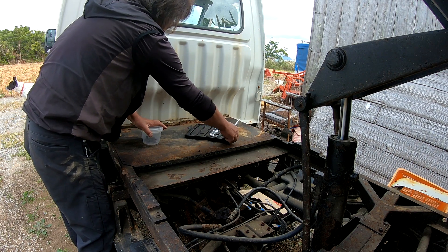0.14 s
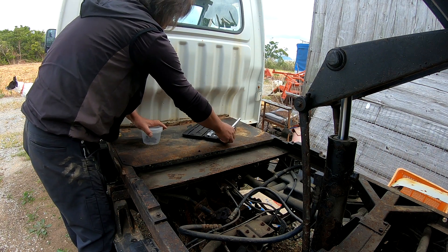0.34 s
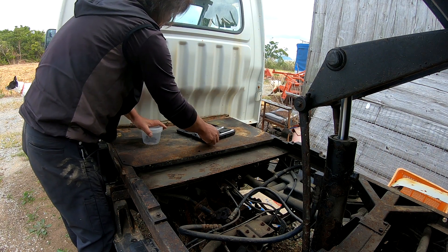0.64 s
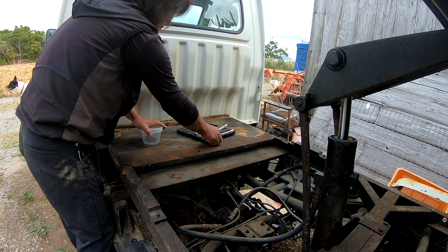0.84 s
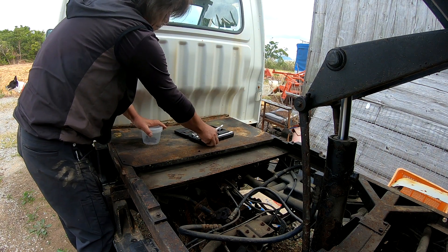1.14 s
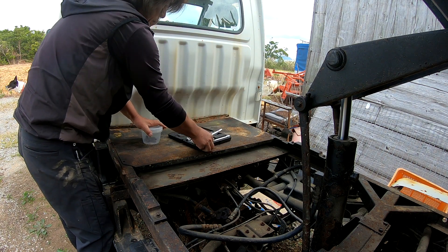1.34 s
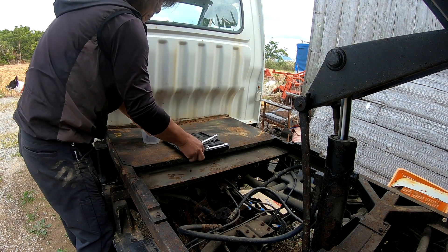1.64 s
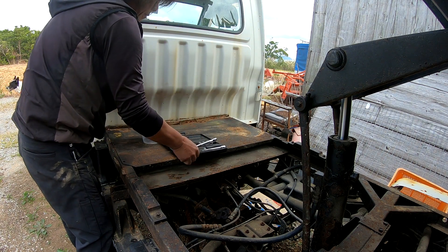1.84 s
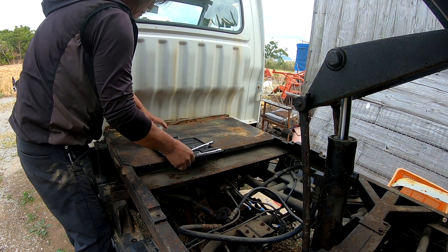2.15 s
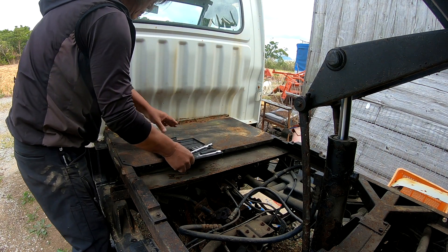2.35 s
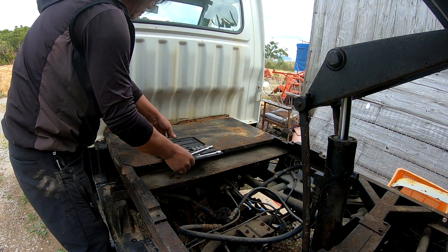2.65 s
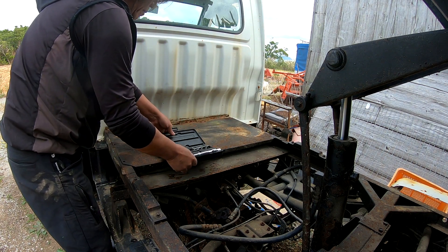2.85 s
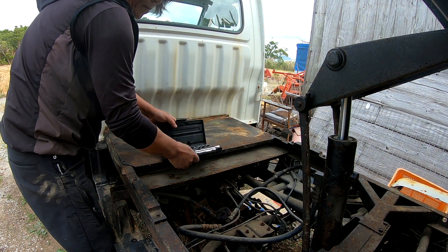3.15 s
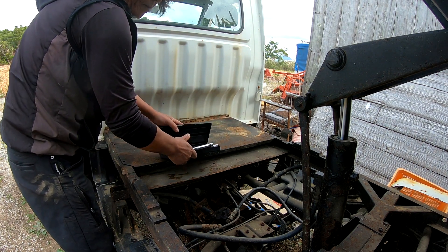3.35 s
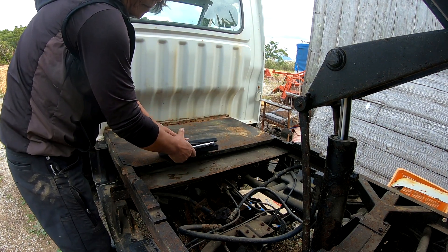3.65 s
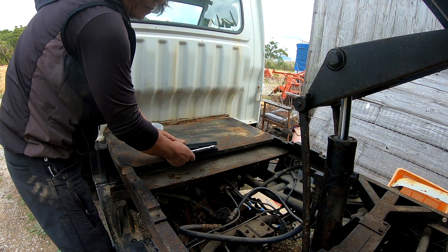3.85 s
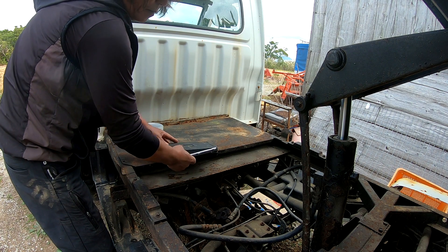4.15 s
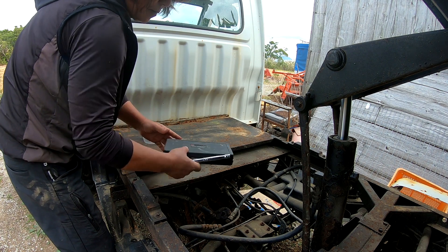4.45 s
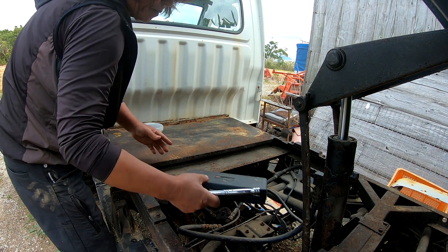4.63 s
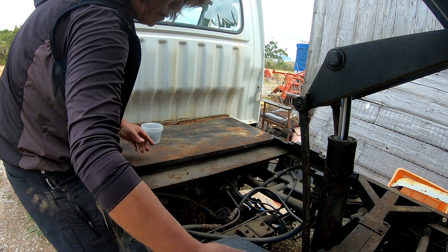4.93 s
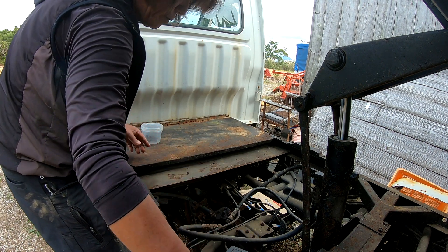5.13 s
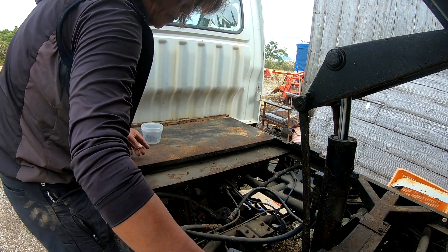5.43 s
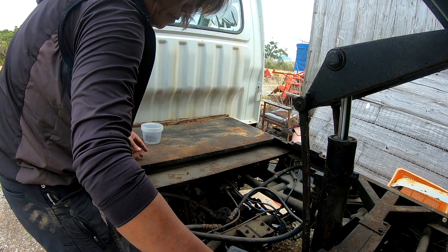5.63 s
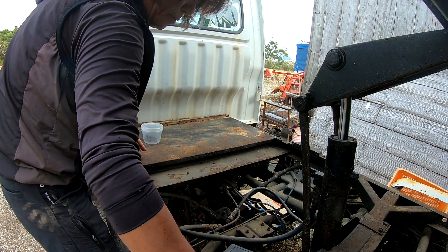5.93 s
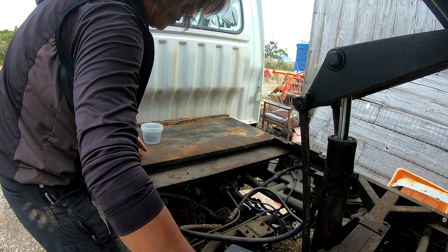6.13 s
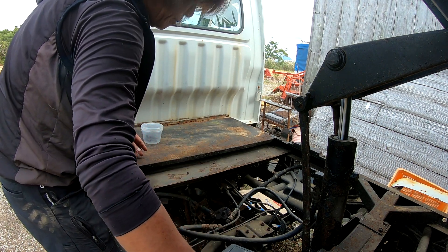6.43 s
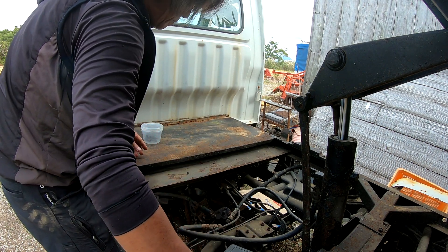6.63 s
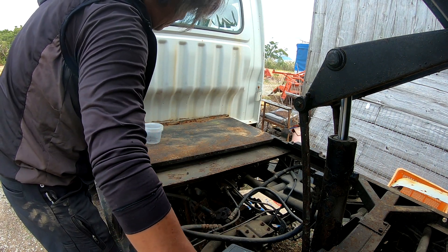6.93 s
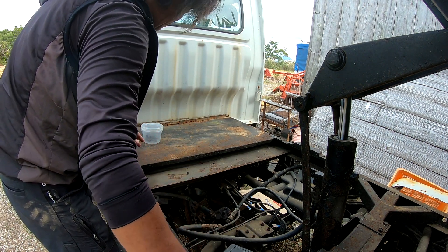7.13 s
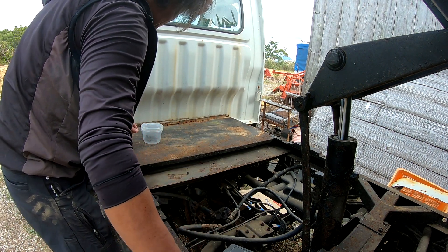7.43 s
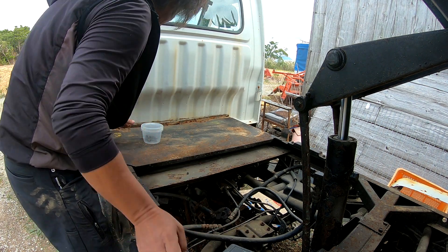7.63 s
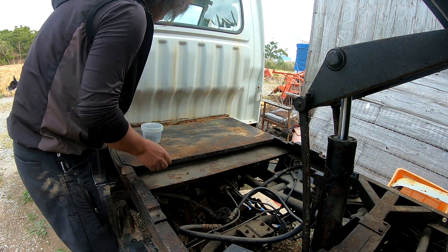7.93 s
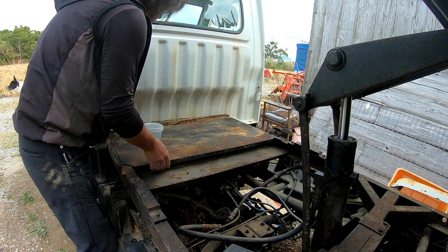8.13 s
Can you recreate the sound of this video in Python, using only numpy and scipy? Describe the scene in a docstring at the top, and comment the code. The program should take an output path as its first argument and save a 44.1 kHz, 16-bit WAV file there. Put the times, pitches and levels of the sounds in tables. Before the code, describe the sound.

Close up in a quiet, breezy yard, a plastic case of sockets is nudged and dragged twice over rusty steel with a gritty scrape and brief groan. The hinge ticks, the lid folds with hollow clacks and faint socket rattle, and a latch snaps. After a pause, the case clunks onto a steel rail, shifts with boomy knocks and clinks, and scuffs lightly. The last knock leaves a low hum. The microphone sits on the frame, so lows are heavy and wide.

```python
"""A plastic socket case is nudged and dragged twice over the rusty steel deck of a truck in a quiet, lightly windy yard.
Then its lid creaks, folds over and snaps shut; the case is set down and shifted on a chassis rail with a few knocks,
and the last one leaves a steel member humming. Blows are bursts of scattered noise, and friction is random grains;
both ring the same steel modes. Shell, rail, frame and latch add decaying sines.
The microphone rides on the frame, so most low sound comes through steel in opposite phase on the two sides."""
import sys
import numpy as np
from scipy import signal
from scipy.fft import rfft, irfft
from scipy.io import wavfile

SR = 44100
rng = np.random.default_rng(int(sys.argv[2]) if len(sys.argv) > 2 else 0)


def generate_wav(sig):
    """Save sig (samples, or channels by samples) to the path in sys.argv[1] as 16-bit PCM at SR."""
    pcm = np.round(np.clip(np.atleast_2d(sig).T, -1, 1) * 32767).astype(np.int16)
    wavfile.write(sys.argv[1], SR, pcm)


N = 365148
TIME = np.arange(N) / SR


def from_db(db):
    """Decibels to gain."""
    return 10 ** (np.asarray(db) / 20)


def rms_one(x):
    """Scale to rms 1."""
    return x / np.sqrt(np.mean(x ** 2) + 1e-20)


def in_time(rows):
    """Each column of a curve at every sample; the end values hold outside its times."""
    s, *columns = np.transpose(rows)
    return [np.interp(TIME, s, column) for column in columns]


def drift(rate):
    """Random wander through normal points of spread 1, joined by straight lines, `rate` points per second."""
    points = rng.standard_normal(20000)
    return np.interp(TIME * rate, np.arange(len(points)), points)


def band(x, low_hz, high_hz, order=2):
    """Causal band-pass."""
    edges = [low_hz, min(high_hz, 0.45 * SR)]
    return signal.sosfilt(signal.butter(order, edges, "band", fs=SR, output="sos"), x + 1e-18)


def resonate(x, hz, width_hz):
    """One resonance, gain about 1 at its top."""
    radius = np.exp(-np.pi * width_hz / SR)
    zeros = np.array([1, 0, -1]) * (1 - radius ** 2) / 2
    poles = [1, -2 * radius * np.cos(2 * np.pi * hz / SR), radius ** 2]
    return signal.lfilter(zeros, poles, x + 1e-18)


def left_right(mid, side, pan_db):
    """Mid and side to two channels; positive pan leans left."""
    return np.array([(mid + side) * from_db(pan_db / 2), (mid - side) * from_db(-pan_db / 2)])


def ping(s, hz, db, t60):
    """One mode set ringing at a given moment: a sine that decays by 60 dB in t60 seconds."""
    out, at = np.zeros(N + SR), int(s * SR)
    age = TIME[:SR]
    out[at:at + SR] = from_db(db - 60 * age / t60) * np.sin(2 * np.pi * hz * age)
    return out[:N]


def friction(grains_per_s, judder_db, judder_rate, size_spread_db=3):
    """Rust grains of uneven size catch and let go at random; judder swells and thins them. Rms 1."""
    caught = rng.random(N) < grains_per_s / SR
    size_db = size_spread_db * rng.standard_normal(N) + judder_db * drift(judder_rate)
    return rms_one(caught * rng.standard_normal((2, N)) * from_db(size_db))


def coloured_noise(colour, side_db, pan_db):
    """Stereo noise with a given spectrum, rms 1."""
    hz, db = np.transpose(colour)
    bins_hz = np.fft.rfftfreq(N, 1 / SR)
    gain = from_db(np.interp(np.log(bins_hz + 1), np.log(hz), db))
    mid, side = irfft(rfft(rng.standard_normal((2, N))) * gain, N)
    return rms_one(left_right(mid, side * from_db(side_db), pan_db))


# low rumble of wind on the microphone, before trim and buffeting: time_s, level_db
WIND_LEVEL = [(0.0, -57), (0.37, -37), (0.99, -46.5), (1.06, -30.5), (1.25, -42.5), (2.3, -41),
              (2.6, -36.5), (3.04, -42), (3.55, -27.5), (4.49, -50.5), (4.66, -37), (4.8, -55), (5.0, -34),
              (5.16, -35.5), (5.33, -32), (5.51, -43.5), (5.72, -30), (6.04, -50), (6.09, -32.5),
              (6.2, -49), (6.78, -40.5), (7.15, -31), (7.96, -57.5), (8.21, -40.5), (8.28, -31.5)]
# spectrum of the wind, relative: pitch_hz, density_db (per Hz)
WIND_SPECTRUM = [(15, -1.5), (30, -1.5), (60, 4), (100, -6), (200, -20.5), (400, -37.5), (1000, -78.5)]
# hush of the yard, before trim and wavering: time_s, level_db
YARD_LEVEL = [(0, -64.5), (2.5, -53.5), (4.7, -54), (5.5, -54), (6.2, -60.5), (7.3, -60), (8.28, -57.5)]
# spectrum of the hush, relative: pitch_hz, density_db (per Hz)
YARD_SPECTRUM = [(40, -37.5), (130, -2), (220, 9), (350, -13.5), (750, -29.5), (1400, -34.5), (3000, -41.5),
                 (7500, -41), (11000, -50.5), (15000, -63.5)]


def outdoors(wind_gain_db=-1, yard_gain_db=3, buffet_db=2, waver_db=2, changes_per_s=9):
    """Lumpy wind at the microphone over a wavering hush, each a coloured noise with a moving level."""
    wind_db = in_time(WIND_LEVEL)[0] + wind_gain_db + buffet_db * drift(changes_per_s)
    yard_db = in_time(YARD_LEVEL)[0] + yard_gain_db + waver_db * drift(changes_per_s)
    wind = from_db(wind_db) * coloured_noise(WIND_SPECTRUM, side_db=-22, pan_db=-4.5)
    yard = from_db(yard_db) * coloured_noise(YARD_SPECTRUM, side_db=0.5, pan_db=0.5)
    return wind + yard


def hum(start_s=7.074, pitch_hz=200.4, level_db=-30.5, t60_s=3, mid_share=0.2, pan_db=-1):
    """A steel member left humming by the last hard knock: one lightly damped mode, mostly side to side."""
    age = np.maximum(TIME - start_s, 0)
    envelope = np.sqrt(2) * from_db(level_db - 60 * age / t60_s)  # level is rms at the start
    tone = envelope * np.sin(2 * np.pi * pitch_hz * age)
    return left_right(mid_share * tone, tone, pan_db)


# the hardest knocks set the frame booming, at a pitch that shifts with the load:
# start_s, pitch_hz, level_db (before pan), t60_s
FRAME_BOOMS = [(4.961, 330, -19.5, 0.095), (5.629, 250, -22, 0.13), (5.867, 311.3, -21.5, 0.31),
               (6.873, 292.6, -23.5, 0.27), (7.076, 265, -27, 0.23)]


def frame_booms(mid_share=0.25, pan_db=-2):
    """A low decaying note of the frame that rocks the microphone sideways."""
    tone = sum(ping(*row) for row in FRAME_BOOMS)
    return left_right(-mid_share * tone, tone, pan_db)


# the case is set down and shifted on the rail; all but strength are relative to it:
# weight is the thud, brightness the tick, ring the tone of the struck part, twist the rocking of the frame
# start_s, strength_db, weight_db, brightness_db, ring_db, twist_db
RAIL_KNOCKS = [(4.959, -26, 9, -30, -9.5, -6), (5.017, -36, 7.5, -27, -10.5, -4),
               (5.163, -29.5, -9, -18.5, -10.5, -10), (5.198, -38.5, 16.5, -28, -5, -8),
               (5.271, -42.5, -12.5, -26, 4, -5.5), (5.311, -46.5, 8.5, -20, -17, -3),
               (5.366, -43.5, -6, -38, -10, -5.5), (5.459, -45, 1, -43.5, -6.5, -8.5),
               (5.593, -31, 10, -28.5, -17, -18), (5.629, -17.5, -2, -35.5, -9, -10),
               (5.638, -27, -3, -27.5, -11, -6), (5.667, -23.5, 3.5, -33.5, 3, -8),
               (5.678, -29.5, -10, -35, 6, -11), (5.688, -32, -3.5, -30, -0.5, -4.5),
               (5.737, -32, -13.5, -31.5, -8, -11), (5.868, -25.5, 0.5, -46, 1, 3),
               (5.917, -28.5, -2, -43, 1.5, 2), (6.041, -28.5, 3.5, -38.5, -12, 7),
               (6.47, -50.5, 11, -65, -20, 11.5), (6.871, -26, 6, -44.5, -3, 5.5),
               (7.074, -27, -6.5, -27.5, -9, 4.5), (7.112, -32.5, -2.5, -43, -4, 2.5)]


def boom(pitch_hz=465, t60_s=0.4, mid_share=0.071, detune=0.0074):
    """Blows that twist the rail leave its main bending mode ringing, detuned a little each time."""
    relative_db, db_per_twist_db = -12.5, 2.6
    out, age = np.zeros(N + SR), np.arange(SR) / SR
    for s, strength_db, *_, twist_db in RAIL_KNOCKS:
        level_db = strength_db + relative_db + db_per_twist_db * twist_db - 60 * age / t60_s
        hz = pitch_hz * (1 + detune * rng.standard_normal())
        out[int(s * SR):][:SR] += from_db(level_db) * np.sin(2 * np.pi * hz * age)
    return left_right(mid_share * out[:N], out[:N], 0)


# the case creeps along the rail and scuffs as it is seated; its first level also holds, faintly, before it:
# time_s, level_db (relative), brightness_db_per_octave
CREEP = [(6.1, -59, -5), (6.31, -58, -10), (6.42, -65, 1), (6.47, -42.5, -10.5), (6.54, -49, -6),
         (6.58, -54, -2), (6.65, -42, -14), (6.685, -54, -9), (6.73, -39, -11), (6.77, -40, -1),
         (6.81, -42.5, -3), (6.86, -51, -2), (6.88, -26, -4.5), (6.94, -49, -2), (7.06, -57, -7.5),
         (7.08, -28.5, -5.5), (7.12, -33, -1), (7.18, -63, 4), (7.3, -100, 0)]
# resonances of that scrape: pitch_hz, width_hz, level_db (relative)
CREEP_MODES = [(455, 35.7, -12.5), (540, 25, -21.5), (621, 28, -10), (715, 18, -12), (928, 29, -15.5),
               (1127, 34, -22), (1312, 70, -13), (1435, 17, -19), (1590, 85, -17.5)]


def creep(wander_db=2.5, wanders_per_s=14, mid_cut_db=4, pan_db=-1.5):
    """A light scrape of grains sings in a few resonances, each swelling and fading as the contact moves."""
    level_db, brightness = in_time(CREEP)
    pivot_hz = CREEP_MODES[2][0]
    out = np.zeros((2, N))
    for hz, width_hz, db in CREEP_MODES:
        grains = friction(grains_per_s=900, judder_db=2, judder_rate=45)
        once = resonate(grains, hz, 2 * width_hz)
        ring = rms_one(resonate(once, hz, 2 * width_hz))
        swelling_db = wander_db * (drift(wanders_per_s) - 0.5)
        tilt_db = brightness * np.log2(hz / pivot_hz)
        out += from_db(level_db + swelling_db + db + tilt_db) * ring
    return left_right(out[0] * from_db(-mid_cut_db), out[1], pan_db) / 2


# the lid hinge slips in single soft ticks: start_s, level_db (before trim and filter)
CREAKS = [(2.371, -61), (2.445, -62), (2.454, -63), (2.47, -66), (2.486, -58), (2.593, -66), (2.641, -64),
          (2.665, -61), (2.674, -61.5), (2.722, -61), (2.742, -58.5), (2.776, -51), (2.787, -59)]


def hinge(gain_db=-2, t60_s=0.012, low_hz=1750, high_hz=2750, pan_db=3):
    """The plastic hinge slips in soft, uneven ticks: short decaying bursts of band-passed noise."""
    slips = np.zeros(N)
    for s, db in CREAKS:
        slips[int(s * SR)] = from_db(db)
    envelope = signal.lfilter([1], [1, -from_db(-60 / (t60_s * SR))], slips + 1e-18)
    creak = band(envelope * rng.standard_normal((2, N)), low_hz, high_hz, order=3)
    creak *= np.sqrt(SR / 2 / (high_hz - low_hz))  # make up for the power lost to the band
    return from_db(gain_db) * left_right(*creak, pan_db)


# the sockets rattle in their tray: start_s, length_s, level_db
RATTLES = [(2.836, 0.062, -61.5), (3.236, 0.0093, -53.5), (3.324, 0.0089, -56), (3.654, 0.026, -50.5),
           (5.153, 0.0066, -60), (5.218, 0.04, -63), (5.262, 0.012, -54.5), (5.621, 0.023, -44.5),
           (5.662, 0.03, -46.5), (5.736, 0.017, -67), (5.861, 0.014, -52), (7.056, 0.038, -69)]
# their short, damped clinks: pitch_hz, width_hz, level_db (relative)
SOCKET_MODES = [(1100, 150, -4), (1430, 190, 5.5), (1920, 165, 2.5), (2290, 300, -1), (2920, 80, -2),
                (3460, 910, -16)]


def sockets(side_db=-3, settle_s=0.019):
    """Loose steel sockets chatter and settle quickly: random clicks ring damped resonances."""
    level = 0
    for s, length_s, db in RATTLES:
        settling = np.exp(-np.clip((TIME - s - length_s) / settle_s, 0, 20))
        level = level + from_db(db) * (TIME > s) * settling
    clicks = friction(grains_per_s=1800, judder_db=1, judder_rate=80)
    rings = sum((-1) ** k * from_db(db) * resonate(clicks, hz, width_hz)
                for k, (hz, width_hz, db) in enumerate(SOCKET_MODES))
    mid, side = band(rings, 1000, 4900)
    return level * rms_one(left_right(mid, side * from_db(side_db), 0))


# a single socket tips against its neighbour: start_s, pitch_hz, level_db (before pan)
CLINKS = [(3.602, 2940, -58), (3.604, 6260, -60), (4.183, 1920, -70), (5.195, 2920, -58), (5.27, 1344, -46),
          (5.272, 2120, -59), (5.629, 1930, -47), (5.669, 1510, -49.5), (5.676, 2030, -42),
          (5.684, 2380, -47), (5.737, 1480, -56)]


def clinks(t60_s=0.059, split=0.044, twin_db=-4, pan_db=-0.5):
    """A socket rings briefly with a close pair of modes."""
    tone = sum(ping(s, hz, db, t60_s) + ping(s, hz * (1 + split), db + twin_db, t60_s) for s, hz, db in CLINKS)
    return left_right(tone, 0, pan_db)


# the latch rings brightly, and the closed case sounds its hollow note: pitch_hz, level_db, t60_s
LATCH_MODES = [(440, -23.5, 0.12), (2050, -42, 0.059), (2290, -33.5, 0.039), (3680, -38, 0.023),
               (4860, -36, 0.032), (5500, -44, .025), (6340, -39.5, 0.032), (7500, -47.5, 0.039)]


def latch(start_s=3.9725):
    """The snap that locks the lid: all its modes set off together."""
    return left_right(sum((-1) ** k * ping(start_s, *mode) for k, mode in enumerate(LATCH_MODES)), 0, 0)


# the closed case sounds a hollow note as it meets the rail: start_s, pitch_hz, level_db, t60_s
HOLLOW_NOTES = [(5.163, 444, -31, 0.067), (5.63, 475, -21, 0.15), (5.748, 812, -44, 0.073),
                (6.043, 489, -33, .12)]


def hollow_notes():
    """The walls of the closed case ring briefly, one decaying sine each time."""
    return left_right(sum(ping(*row) for row in HOLLOW_NOTES), 0, 0)


# the case damps the rail while pressed on and lets it ring when tipped; the first value also serves
# all earlier blows, on the shell too: time_s, ring_time_factor
DAMPING = [(5.75, 0.66), (5.85, 1.5), (6.1, 1.14), (6.8, 0.68)]


def struck_part(modes, knocks, side_db, spread_db, detune):
    """Every blow rings each mode as a beating pair of uneven strength; grip and load detune them a little."""
    out, age = np.zeros((2, N)), np.arange(SR // 3) / SR
    hz, db, t60 = np.transpose(modes + modes)[:, :, None]
    for s, strength_db, _, _, ring_db, twist_db in knocks:
        pitch = hz * (1 + detune * rng.standard_normal(hz.shape))
        uneven_db = spread_db * rng.standard_normal((2, *hz.shape))
        sign = rng.choice([-1, 1], (2, *hz.shape))
        strength = sign * from_db(strength_db + ring_db + db + uneven_db)
        damped_t60 = t60 * np.interp(s, *np.transpose(DAMPING))
        tones = from_db(-60 * age / damped_t60) * np.sin(2 * np.pi * pitch * age)
        rings = np.sum(strength * tones, axis=1)
        out[:, int(s * SR):][:, :len(age)] += rings * from_db([[0], [twist_db]])  # twist lifts the side
    mid, side = band(out, hz.min() / 2, hz.max() * 1.2, order=3) / np.linalg.norm(from_db(db))
    return left_right(mid, side * from_db(side_db), 0)


# modes of the plastic shell: pitch_hz, level_db (relative), t60_s (before damping)
SHELL_MODES = [(392, 17, 0.12), (465, 0.5, 0.036), (658, 3.5, 0.09), (752, 3, 0.15), (862, -6, 0.21),
               (1188, -4, 0.072), (1323, 2, 0.14), (1660, -3.5, 0.13), (1980, -4, 0.06), (2320, 0.5, 0.045)]
# modes of the chassis rail, the short ones being the dull clunk of contact:
# pitch_hz, level_db (relative), t60_s (before damping)
RAIL_MODES = [(325.5, 9.5, 0.31), (491, 16, 0.12), (575, 3.5, 0.069), (730, 8, 0.1), (840, 10.5, 0.026),
              (956, -1, 0.17), (1024, -5, 0.12), (1160, 4.5, 0.1), (1260, 12, 0.012), (1310, 7, 0.044),
              (1380, -6.5, 0.19), (1590, -2.5, 0.052), (2078, -12.5, 0.1), (2350, -7, 0.064)]
# the case bumps on the deck, its lid folds over and snaps shut; all but strength are relative to it:
# start_s, strength_db, weight_db, brightness_db, ring_db, twist_db
CASE_KNOCKS = [(0.029, -41, 20.5, -48, -24, 8), (0.855, -36.5, -2.5, -22, -15.5, 0),
               (1.048, -34, 18.5, -20, -5, 5), (1.62, -33, 6, -19, -7, 4), (2.146, -22.5, 1, -49, -32, -5),
               (2.839, -45.5, -4, -14, -15, -2), (2.847, -30.5, 8, -29.5, -16, 3.5),
               (3.241, -37.5, 15.5, -26, -5.5, 5), (3.283, -43.5, 2.5, -17, -21, -1),
               (3.332, -27.5, -22, -32, -9, -14), (3.372, -34.5, -8.5, -18.5, -2, -2),
               (3.501, -35, 9, -41, -11, -1), (3.656, -24, 7, -16, -7, -20),
               (3.662, -21.5, -13, -21, -3, 2), (3.741, -46, 10.5, -29, 8.5, -0.5),
               (3.855, -60, 29.5, -6.5, -11, 3), (3.94, -38.5, 0, -18, 0, -2), (3.973, -31, 5, -12, -2, -2)]


def shell_and_rail(shell_db=2, rail_db=-0.5):
    """The hollow snap of the plastic case and the clank of the rail, each ringing its own modes."""
    shell = struck_part(SHELL_MODES, CASE_KNOCKS, side_db=-6.5, spread_db=3.5, detune=0.0057)
    rail = struck_part(RAIL_MODES, RAIL_KNOCKS, side_db=5, spread_db=2, detune=0.016)
    return from_db(shell_db) * shell + from_db(rail_db) * rail


# the dragged case groans as it sticks and slips; the first level also holds, faintly, before it:
# time_s, pitch_hz (before waver), level_db
GROAN = [(.46, 268, -56.5), (.495, 280, -24.5), (.53, 289.7, -22.5), (.55, 280, -28), (.58, 287, -46),
         (.65, 278, -110)]


def groan(waver=0.012, wavers_per_s=60, side_share=0.49):
    """For a moment the slips lock to a mode of the deck: one wavering sine."""
    hz, db = in_time(GROAN)
    phase = 2 * np.pi * np.cumsum(hz * (1 + waver * drift(wavers_per_s))) / SR
    return from_db(db) * left_right(np.sin(phase), side_share * np.cos(phase), 0)


# a hard grain screeches briefly under the case: start_s, length_s, level_db
SCREECHES = [(0.29, 0.01, -47), (1.827, 0.01, -49), (1.868, 0.0098, -48.5), (1.912, 0.0026, -42),
             (1.93, 0.0031, -36.5), (2.049, 0.0068, -46)]


def screech(hz=7600, width_hz=1300, rise_s=0.0032, fall_s=0.0068, pan_db=2):
    """Very fast slips, over almost at once: noise through a narrow treble resonance."""
    level = 0
    for s, length_s, db in SCREECHES:
        rise = np.clip((TIME - s) / rise_s, 0, 1)
        fall = np.exp(-np.clip((TIME - s - length_s) / fall_s, 0, 20))
        level = level + from_db(db) * rise * fall
    once = resonate(rng.standard_normal((2, N)), hz, 2 * width_hz)
    mid, side = resonate(once, hz, 2 * width_hz)
    return level * rms_one(left_right(mid, side, pan_db))


def swell(start_s, length_s, attack_s=0.016, release_s=0.036):
    """Attack, hold and release of one movement of the hand."""
    out, at = np.zeros(N), int(max(start_s, 0) * SR)
    age = TIME[:min(int((length_s + 0.5) * SR), N - at)]
    release = np.exp(-np.maximum(age - length_s, 0) / release_s)
    out[at:at + len(age)] = np.minimum(age / attack_s, 1) * release
    return out


# early in a drag fresh rust sizzles under the case: start_s, length_s, level_db
SIZZLES = [(0.012, 0.078, -67.5), (0.254, 0.3, -61), (1.136, 0.13, -57.5)]


def sizzle(low_hz=10000, high_hz=13500, pan_db=2):
    """The finest grains hiss in the high treble, passed straight through a band instead of the deck modes."""
    level = sum(from_db(db) * swell(s, length_s) for s, length_s, db in SIZZLES)
    grains = friction(grains_per_s=3400, judder_db=7.5, judder_rate=110)
    return level * rms_one(left_right(*band(grains, low_hz, high_hz), pan_db))


def register_levels(strength_db, weight_db, brightness_db, clack_share=0.75):
    """Thud, body, clack and tick of one contact: weight feeds the lows, a hard contact the highs."""
    return strength_db + np.array([weight_db, 0, clack_share * brightness_db, brightness_db])


# the case catches on a grain of rust: start_s, strength_db (relative)
CATCHES = [(0.278, -55.5), (0.397, -52), (1.158, -52.5), (1.214, -50.5), (1.261, -51), (1.408, -50.5),
           (1.62, -53.5), (1.838, -52), (1.93, -52.5), (1.986, -58.5), (2.057, -66), (2.335, -77.5),
           (6.552, -80.5), (6.817, -74)]
# how a blow feeds the steel: sway relative to thud in dB, ring time factor
ON_DECK, ON_RAIL, ON_GRIT = (-20.5, 0.57), (-11, 0.9), (-10, 0.64)


def all_blows(catch_weight_db=19, catch_brightness_db=7.5, weight_doubles_ring_db=20):
    """Every knock and catch as start_s, register levels_db, ring time factor, twist_db; heavy ones ring longer."""
    catches = [(s, db, catch_weight_db, catch_brightness_db, 0, 0) for s, db in CATCHES]
    for rows, (sway_db, ring) in ((CASE_KNOCKS, ON_DECK), (RAIL_KNOCKS, ON_RAIL), (catches, ON_GRIT)):
        for s, strength_db, weight_db, brightness_db, _, twist_db in rows:
            levels_db = register_levels(strength_db, weight_db, brightness_db)
            ring_factor = np.clip(ring * 2 ** (weight_db / weight_doubles_ring_db), 0.1, 1)
            yield s, [levels_db[0] + sway_db, *levels_db], ring_factor, twist_db


def blows(index, t60_s, air, crack=0.49, scatter=0.81, crack_follows_brightness=0.11):
    """Each blow is one push, sharper if the contact is hard, then waves that scatter in the steel and die away."""
    force = np.zeros((2, N))
    push = np.array([air, -np.sqrt(1 - air ** 2)])  # mid by air, side through the steel
    for s, levels_db, ring_factor, twist_db in all_blows():
        at, decay = int(s * SR), t60_s * ring_factor * SR / np.log(1000)
        age = np.arange(min(N - at, SR))
        blow = scatter * np.exp(-age / decay) * rng.standard_normal((2, len(age)))
        brightness_db = levels_db[4] - levels_db[2]
        blow[:, 0] += crack * from_db(crack_follows_brightness * brightness_db) * np.sqrt(decay / 2) * push
        if index == 2:  # twist rocks the body register sideways
            blow[1] *= from_db(twist_db)
        force[:, at:at + len(age)] += from_db(levels_db[index]) * blow
    return force


# drone, grind, rasp, hiss: full_vigour_level_db (before the deck), db_per_db_of_vigour, lag_s,
# grains_per_s, judder_db, judders_per_s
FRICTION = [(-17.5, 0.43, 0.029, 3600, 0.5, 40), (-25, 0.73, 0.015, 2000, 1, 70),
            (-40, 0.71, 0, 3000, 0.9, 130), (-45, 0.69, 0.001, 8300, 0.5, 260)]
# vigour of the nudge and of the two drags across the deck: time_s, vigour_db
NUDGE = [(0.01, -70), (0.028, -66.5), (0.07, -71), (0.084, -60.5), (0.122, -78), (0.146, -66), (0.21, -101)]
SHORT_DRAG = [(0.211, -77.5), (0.284, -69), (0.33, -60), (0.355, -53.5), (0.382, -60), (0.406, -56),
              (0.434, -61), (0.53, -46), (0.565, -55), (0.622, -63.5), (0.645, -73.5), (0.719, -100)]
LONG_DRAG = [(1.015, -81), (1.054, -59), (1.076, -58), (1.42, -43.5), (1.53, -47.5), (1.68, -57.5),
             (1.79, -58.5), (1.832, -61.5), (1.912, -58), (1.93, -55.5), (1.97, -59.5), (2.016, -52.5),
             (2.128, -65.5), (2.163, -55.5), (2.3, -89)]
# the case shifts under the hands; weight and brightness are relative to strength:
# start_s, length_s, strength_db, weight_db, brightness_db
RUBS = [(0.692, 0.59, -61, 20, -14.5), (1.028, 0.076, -41, 18.5, -17), (2.2, 0.21, -59.5, 22.5, -45),
        (2.714, 0.3, -61.5, 20.5, -16.5), (2.856, 0.15, -45.5, 14.5, -27.5), (3.015, 0.18, -63, 23, -13.5),
        (3.154, 0.32, -49, 16, -19), (3.455, 0.091, -58.5, 21, -20.5), (3.576, 0.061, -42, 3, -23.5),
        (3.639, 0.13, -44.5, 17, -33), (3.75, 0.44, -59.5, 24, -22.5), (4.137, 0.019, -58, 10, -11),
        (4.933, 0.019, -46, 20, -30.5), (5.205, 0.047, -40, 0.5, -33), (5.272, 0.023, -47.5, 5, -30),
        (5.312, 0.88, -59.5, 19.5, -28.5), (5.622, 0.046, -41.5, 4.5, -29.5), (6.062, 0.14, -67.5, 27, -55),
        (6.168, 0.64, -71, 25.5, -52.5), (6.441, 0.094, -54.5, 17.5, -51), (6.62, 0.025, -61, 24, -56.5),
        (6.733, 0.08, -53, 19.5, -33), (6.904, 0.13, -61.5, 8, -40), (7.058, 0.12, -52.5, -7, -32),
        (8.142, 0.17, -60.5, 0, -18.5)]


def sliding_levels(index, full_vigour_db=-43):
    """Dragging and rubbing gain in one register: a drag brightens with its vigour and its lows follow late."""
    full_db, follows, lag_s = FRICTION[index][:3]
    rub_power = sum((from_db(register_levels(*contact)[index]) * swell(s, length_s)) ** 2
                    for s, length_s, *contact in RUBS)
    dragged = 0
    for drag in (NUDGE, SHORT_DRAG, LONG_DRAG):
        s, vigour_db = np.transpose(drag)
        level_db = full_db + follows * (np.interp(TIME - lag_s, s, vigour_db) - full_vigour_db)
        dragged = dragged + from_db(level_db) * swell(s[0], s[-1] - s[0])
    return dragged, np.sqrt(rub_power)


def sliding(index):
    """Friction in one register: random grains for the drags, and jerkier ones for the rubs."""
    dragged, rubbed = sliding_levels(index)
    rub_grains = friction(grains_per_s=7000, judder_db=2, judder_rate=60)
    return dragged * friction(*FRICTION[index][3:]) + rubbed * rub_grains


# the plate's edges send the scraping back: delay_s (middle of its wander), share
EDGE_ECHOES = [(.0013, .45), (.0031, .45), (.0057, .35)]


def edge_echoes(force, shift=0.22, shifts_per_s=7):
    """Short reflections, their delays wandering as the case moves, give a shifting metallic colour."""
    out = force.copy()
    for delay_s, share in EDGE_ECHOES:
        delay = np.round(delay_s * SR * np.exp(shift * drift(shifts_per_s))).astype(int)
        sent = np.arange(N) - delay
        out += share * force[:, np.maximum(sent, 0)]
    return out / np.sqrt(1 + sum(share ** 2 for _, share in EDGE_ECHOES))


# modes of deck, frame and case: pitch_hz, width_hz, level_db (relative within the register), side_over_mid_db
DECK_MODES = [(49.7, 4.1, 1.5, 25.5), (64.8, 57, 4.5, 7), (122.5, 9.7, 3, 6), (175.6, 17.2, 3, 13.5),
              (178.4, 12, -2.5, 7), (212.5, 70, -18, 7.5), (243, 11, -8.5, 15.5), (280, 28.7, -7, 4.5),
              (330, 60, -8, 1.5), (436, 7.2, 5, 13), (480, 12, 4, 15), (541, 10, 0.5, 12.5),
              (618, 32.4, -2, 9), (719, 14, -7, 7.5), (790, 130, -12.5, 10.5), (932, 43.5, -8, 12),
              (958, 86, -14, 6), (1144, 41, 4.5, -2.5), (1268, 53, 2, -3), (1490, 82, 2, -1.5),
              (1646, 460, -3, 0.5), (2163, 187, 0.5, 0), (2368, 230, -4, -3), (3020, 380, -6.5, -6.5),
              (3295, 72, 0.5, -1), (3730, 380, 1.5, -9.5), (5110, 830, -2.5, -6.5), (6110, 1010, -2, -5),
              (7660, 830, 1.5, -0.5), (9930, 1400, -7.5, 0.5), (12400, 1800, -18.5, -1.5)]


def deck(force, low_hz, high_hz, pan_db, shared=0.48, airborne_hz=900):
    """A mid and side force rings the modes of one register; white force keeps about its level."""
    out, power = np.zeros((2, N)), 1e-12
    for k, (hz, width_hz, db, side_db) in enumerate(DECK_MODES):
        if low_hz < hz < high_hz:
            mid, side = resonate(force, hz, width_hz)
            if hz > airborne_hz:  # the slope of the mid, as side, makes high modes reach the left first
                slope = np.gradient(mid) / np.sin(2 * np.pi * hz / SR)
                side = shared * slope + np.sqrt(1 - shared ** 2) * side
            mode = np.array([mid, side * from_db(side_db)]) / np.hypot(1, from_db(side_db))
            out += (-1) ** k * from_db(db) * mode
            power += from_db(db) ** 2 * np.pi * width_hz / SR
    return left_right(*band(out, low_hz, high_hz, order=3), pan_db) / np.sqrt(power)


# sway, thud, body, clack, tick: low_hz, high_hz, t60_s (before ring factor), air_share of a blow,
# left_over_right_db, blow_gain_db
REGISTERS = [(31.4, 83, 1, 0.84, -6, 7.5), (91, 306, 0.43, 1, -4, 0.5), (307, 1028, 0.16, 0.39, -2.5, 1),
             (1140, 3240, 0.16, 0.25, -0.5, 2), (3130, 13000, 0.14, 0.88, 2, 2)]


def case_on_steel(drone_sway_db=-7):
    """Blows and friction of the case drive the same steel modes, register by register."""
    drone, grind, rasp, hiss = (sliding(k) for k in range(len(FRICTION)))
    sway = from_db(drone_sway_db) * drone
    rubbing = [sway, drone, grind, edge_echoes(rasp), edge_echoes(hiss)]
    out = np.zeros((2, N))
    for k, (low_hz, high_hz, t60_s, air, pan_db, blow_db) in enumerate(REGISTERS):
        force = rubbing[k] + from_db(blow_db) * blows(k, t60_s, air)
        out += deck(force, low_hz, high_hz, pan_db)
    return out


def scene():
    """Everything at the microphone, from the background to the case on the steel."""
    background = outdoors() + hum()
    frame_and_rail = frame_booms() + boom() + creep()
    case_parts = hinge() + sockets() + clinks() + latch() + hollow_notes() + shell_and_rail()
    dragging = groan() + screech() + sizzle()
    return background + frame_and_rail + case_parts + dragging + case_on_steel()


def record(dry, cutoff_hz=15700):
    """The top is cut steeply, down 70 dB from the cutoff on."""
    return signal.sosfilt(signal.cheby2(16, 70, cutoff_hz, fs=SR, output="sos"), dry)


dry = scene()
out = record(dry)
generate_wav(out)
```